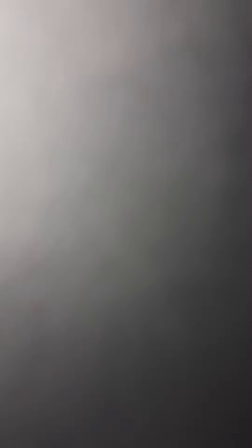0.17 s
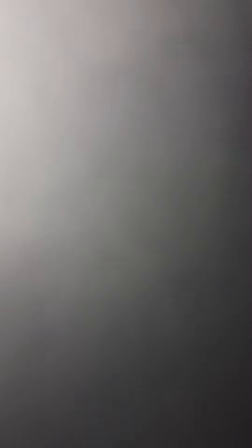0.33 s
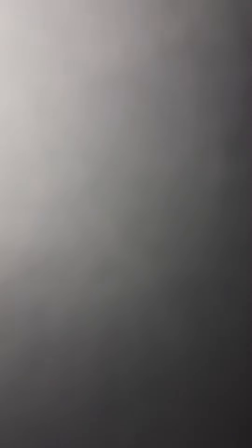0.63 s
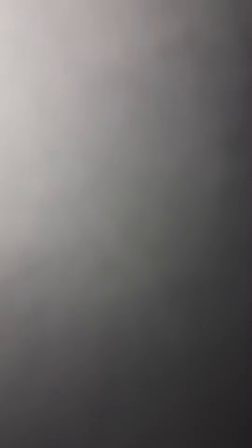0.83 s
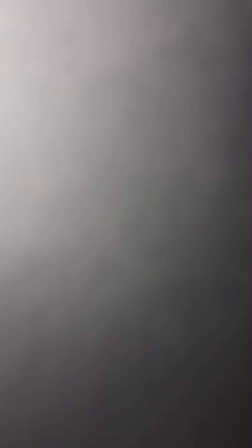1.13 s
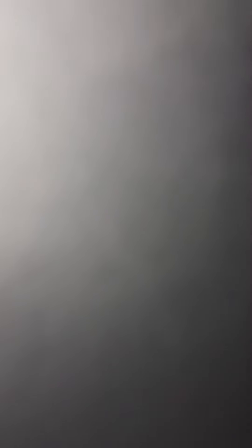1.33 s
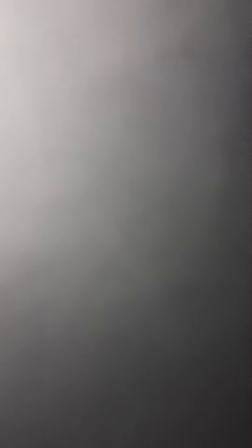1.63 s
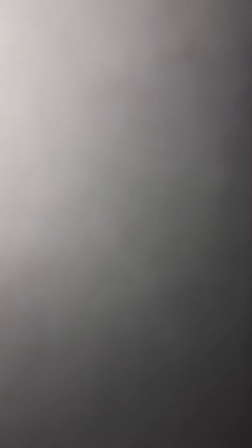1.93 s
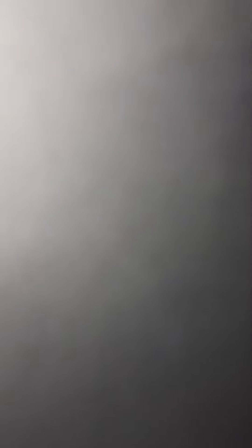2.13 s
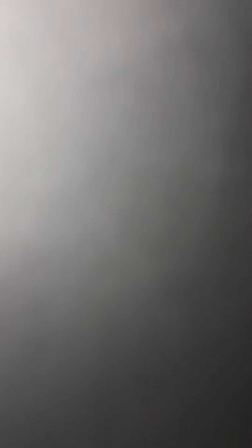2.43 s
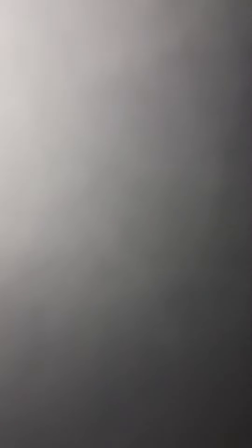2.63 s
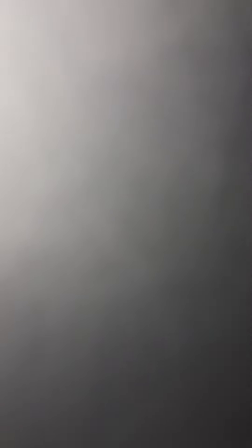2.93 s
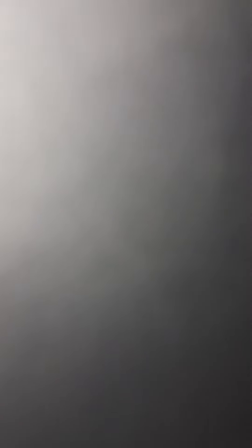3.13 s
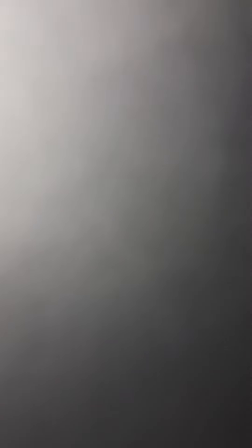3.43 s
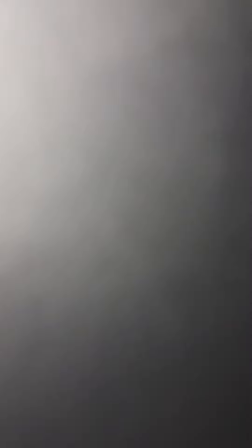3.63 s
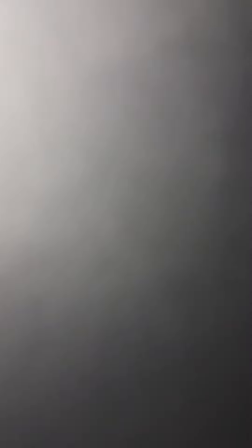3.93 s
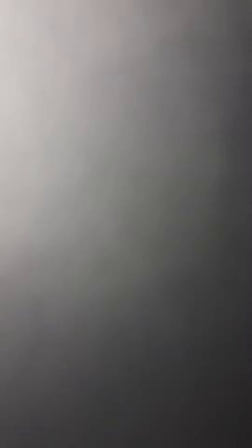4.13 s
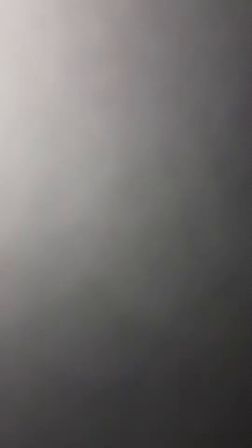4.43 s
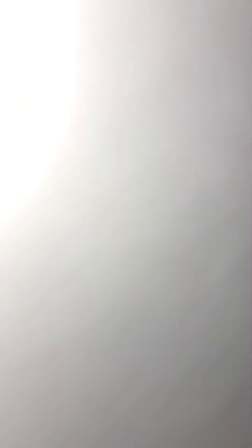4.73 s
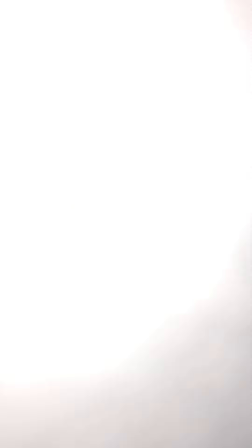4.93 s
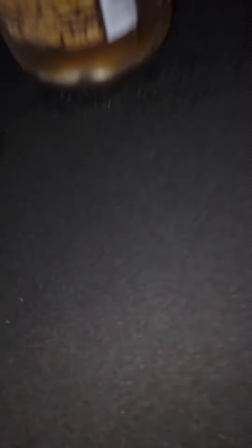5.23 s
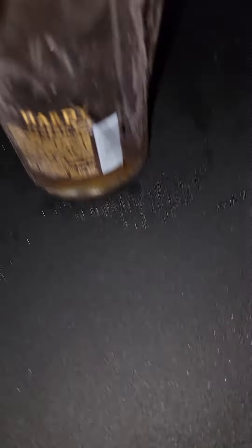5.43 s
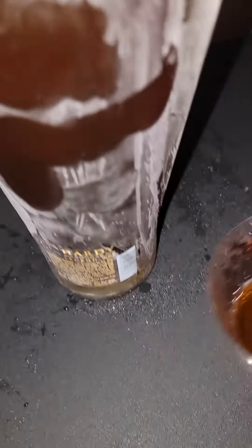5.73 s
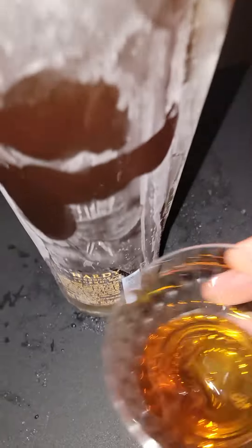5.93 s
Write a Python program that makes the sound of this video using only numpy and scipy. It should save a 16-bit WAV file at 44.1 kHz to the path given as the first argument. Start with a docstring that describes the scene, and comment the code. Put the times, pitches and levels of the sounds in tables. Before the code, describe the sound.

Glassware knocks and clinks on a wooden table, then fingers rub loudly against the microphone and a glass slides along.

```python
"""At a hard wooden table in a quiet room, a glass bottle and a drinking glass are knocked about.
They clink and the liquid plips. A recorder lies on the table, so each blow reaches it as a thud
through the wood. Fingers then drag the recorder off: its case rubs, sticks and slips right at the
microphones. Last, the glass slides over the table top. The room hums softly underneath."""
import sys
import numpy as np
from scipy import signal
from scipy.fft import rfft, irfft
from scipy.io import wavfile

SR = 44100
rng = np.random.default_rng(int(sys.argv[2]) if len(sys.argv) > 2 else 0)


def transcribe(u):
    """Save the signal u as a 16-bit wav file named by the first command-line argument.

    u: samples, shape (n,) or (channels, n), limited to [-1, 1]; the rate is SR.
    q: integer samples, one column per channel.
    """
    v = np.clip(np.atleast_2d(u).T, -1, 1)
    q = np.round(v * 32767).astype(np.int16)
    wavfile.write(sys.argv[1], SR, q)


N = 267687
TIME = np.arange(N) / SR
RING_TIME = TIME[:SR // 2]   # half a second for one blow to ring out

# The tone of glass hitting wood: (frequency [Hz], relative level [dB])
CRACK_TONE = [(500, -4), (1000, -2), (1800, -10), (3000, -14), (4800, -16.5), (6000, -24.5), (7700, -22.5),
              (9900, -38.5), (16000, -42)]


def knocks():
    """Glassware lands twice, on its edge and then flat on its foot; a light knock strikes once, softly."""
    # Glassware set down: (time [s], force [dB], extra thump [dB], extra crack [dB], time to fall flat [s])
    landings = [(0.311, -15, 5, -28, 0.0066), (0.42, -27.5, 6, -5, 0.0055), (0.583, -17, -28, -7, 0.0055),
                (2.738, -18, 2.5, -24, .013)]
    # Light knocks: (time [s], force [dB], extra crack [dB])
    light_knocks = [(0.729, -42, -6), (1.05, -43, -42), (1.0883, -25, -13.5), (1.289, -41, -37),
                    (1.718, -27, -6.5), (1.807, -46.5, 4.5), (2.2527, -33, -13), (2.297, -33.5, -9),
                    (2.98, -22, -11), (3.104, -25.5, -30), (3.41, -48.5, -29.5)]
    out = np.zeros((2, N))
    for s, force_db, thump_db, crack_db, fall_s in landings:
        add(out, s, blow(force_db, thump_db, crack_db))
        add(out, s + fall_s, blow(force_db + 3, thump_db - 11.5, crack_db=-16))
    muffle = signal.butter(1, 2630, fs=SR)
    for s, force_db, crack_db in light_knocks:
        knock = blow(force_db, thump_db=-16.5, crack_db=crack_db)
        add(out, s, signal.lfilter(*muffle, knock) * fade_in(0.0014))
    return out


def blow(force_db, thump_db, crack_db):
    """A blow sways the table, rings its top and cracks at the point of contact."""
    thump = from_db(thump_db) * table_sway()
    contact = from_db(crack_db) * crack(t60=0.0037, tail_db=-18.5, tail_t60=0.059)
    return from_db(force_db) * (thump + table_top() + contact)


def table_top():
    """The wooden top rings after one contact."""
    # Its notes: (pitch [Hz], relative level [dB], ring time [s])
    notes = [(125.3, -8, 0.24), (212, -6.5, 0.2), (265.9, 1, 0.1), (346, 10.5, 0.086), (431, 8, 0.063),
             (556.4, 4.5, 0.081), (776, 3, 0.029), (914, 3.5, 0.031), (1093, -6.5, 0.033),
             (1518, -5, 0.021)]
    return body(notes, vary_db=2, pan_db=1, pan_octave_db=0.22, detune=0.028, twist=3.724, twist_hz=280.2)


def table_sway():
    """The whole table sways with a low thump."""
    # Its notes: (pitch [Hz], relative level [dB], ring time [s])
    notes = [(66, 1.5, 0.046), (84, 0.5, 0.11), (109, -5, 0.075)]
    return body(notes, vary_db=3.5, pan_db=4.5, pan_octave_db=-1.5, detune=0.012, twist=1, twist_hz=75)


def body(notes, vary_db, pan_db, pan_octave_db, detune, twist, twist_hz, in_step=False):
    """A struck object rings at its own notes, tuned a little differently by each grip or load."""
    out = 0
    for k, (hz, level_db, t60) in enumerate(notes):
        # Notes above twist_hz shake the two microphones out of step, by up to twist radians.
        lag = twist / (1 + (twist_hz / hz) ** 6)
        hz = hz * np.exp(detune * rng.standard_normal())
        swing = np.sin(2 * np.pi * hz * RING_TIME + np.array([[0], [-lag]]))
        swell = 1 - np.exp(-(2 * hz * RING_TIME) ** 2)   # builds up in about half a cycle
        fade = fade_out(t60, level_db + vary_db * rng.standard_normal())
        sign = 1 if in_step else (-1) ** k
        octaves_up = np.log2(hz / notes[0][0])
        out = out + sign * panned(swing * swell * fade, pan_db + pan_octave_db * octaves_up)
    return unit_hit(out)


def crack(t60, tail_db, tail_t60):
    """A hard contact rings many high notes at once: a short burst of noise with a weak tail."""
    fade = fade_out(t60) + fade_out(tail_t60, tail_db)
    noise = rng.standard_normal((2, len(fade)))
    opposed = 1.59 * rng.standard_normal(len(fade)) * [[1], [-1]]   # left and right swing opposite ways
    return unit_hit(colour((noise + opposed) * fade, CRACK_TONE))


def handling():
    """Fingers rub the recorder's case: a light grip and longer drags, with shoves and slips on top."""
    # The hand's steady light rubbing: (start [s], length [s], level [dB])
    grip = [(3.56, 1.314, -35.5)]
    # Fingers dragging over the case: (start [s], length [s], level [dB])
    drags = [(3.768, 0.045, -26), (3.855, 0.19, -15.5), (4.06, 0.043, -22.5), (4.26, 0.041, -17.5),
             (4.44, 0.23, -28)]
    # Hard shoves: (start [s], length [s], level [dB])
    shoves = [(3.548, 0.073, -10.5), (4.178, 0.0076, -16), (4.3, 0.027, -14), (4.51, 0.15, -22),
              (4.567, 0.062, -19.5), (4.786, 0.055, -23)]
    # How a firm grip changes the tone: (frequency [Hz], boost [dB])
    firm_tone = [(300, -5), (1200, 4), (12000, 3.5)]
    # A high ring under a firm grip: (pitch [Hz], width [Hz], boost [dB])
    firm_peaks = [(2617, 64, 7.5)]
    hold = effort(grip, rise_s=0.03, sag_db_per_s=2.5, fade_s=0.127)
    drag = effort(drags, rise_s=0.32, sag_db_per_s=14.5, fade_s=0.38)
    # The fingers catch and let go: a new random level every 5 ms.
    flutter = from_db(1.47 * np.interp(TIME / 0.005, np.arange(N), rng.standard_normal(N)))
    rub = np.maximum(hold, drag) * flutter * case_scrape(loose=1.4, per_s=1900, spread_db=2.5)
    push = effort(shoves, rise_s=0.041, sag_db_per_s=64.5, fade_s=0.085)
    firm_scrape = colour(case_scrape(loose=1, per_s=1600, spread_db=1.55), firm_tone)
    shove = push * resonate(firm_scrape, firm_peaks)
    return hand_hollow(rub + shove + slips())


def case_scrape(loose, per_s, spread_db):
    """Rubbing shakes the whole case and also rocks it, moving the microphones opposite ways."""
    # The tone of the rubbing: (frequency [Hz], relative level [dB])
    rub_tone = [(40, -24.5), (140, -19.5), (280, -6), (520, -16.5), (1500, -31.5), (3000, -37), (4200, -42),
                (5000, -47.5), (8000, -59.5), (9500, -73), (16000, -71.5)]
    # How much stronger rocking is than shaking: (frequency [Hz], boost [dB])
    rock_tone = [(100, 2), (220, -10.5), (350, 8), (900, 6.5), (3000, 0.5)]
    # Where the held case rings: (pitch [Hz], width [Hz], boost [dB])
    case_peaks = [(286, 38.7, 8.5), (692, 120, 8), (895, 39, 5.5), (7150, 550, 10)]
    shake = friction(per_s, spread_db)
    twist = unit_power(shake + loose * friction(per_s, spread_db))
    rock = colour(twist, rock_tone) * [[-1], [1]]
    return resonate(colour(shake + rock, rub_tone), case_peaks)


def slips():
    """The case sticks and slips under the fingers, singly or in creaking runs."""
    # The grip lets go: (time [s], ring level [dB], snap level [dB])
    releases = [(3.5454, -19.5, -20), (3.6155, -21.5, -28), (3.724, -27.5, -37), (4.004, -24, -40.5),
                (4.141, -26, -37), (4.1897, -17.5, -36.5), (4.244, -28.5, -34.5), (4.2648, -14, -24.5),
                (4.285, -21, -20), (4.2993, -17, -22), (4.3131, -21, -22.5), (4.3211, -19, -25.5),
                (4.3499, -24, -30), (4.368, -21.5, -33), (4.4094, -28, -30), (4.4934, -21, -18.5),
                (4.5209, -12.5, -20.5), (4.5254, -17, -21.5), (4.5437, -23.5, -17), (4.5631, -11, -16),
                (4.581, -14.5, -17.5), (4.588, -15.5, -18.5), (4.5927, -15.5, -31.5), (4.603, -13.5, -21),
                (4.6123, -13, -31), (4.6309, -14, -27.5), (4.6391, -16.5, -28), (4.6471, -14, -40.5),
                (4.659, -27, -32), (4.6817, -19.5, -35), (4.789, -13.5, -25.5), (4.812, -14.5, -26)]
    # A looser grip lets the case ring longer: (time [s], ring time [times the usual])
    looseness = [(4.27, 0.54), (4.5, 0.29), (4.55, 1.64), (4.6, 0.8), (4.8, 1.33)]
    out = np.zeros((2, N))
    for s, ring_db, snap_db in releases:
        ring_stretch = np.interp(s, *np.transpose(looseness))
        add(out, s, slip(ring_db, snap_db, ring_stretch))
    return out


def slip(ring_db, snap_db, ring_stretch):
    """One slip is a sharp snap with a brief chatter, and it sets the case ringing."""
    # The notes of the case: (pitch [Hz], relative level [dB], usual ring time [s])
    case_notes = [(217.6, 1, 0.1), (306, -2.5, 0.11), (379, -0.5, 0.063), (558, -1, 0.067),
                  (700, 4.5, 0.031)]
    # The tone of the snap: (frequency [Hz], relative level [dB])
    snap_tone = [(120, -21), (600, 14), (1100, 0), (1700, -3), (2300, -5), (3100, -15), (4400, -18),
                 (7300, -22), (9700, -43.5), (16000, -40.5)]
    notes = [(hz, note_db, t60 * ring_stretch) for hz, note_db, t60 in case_notes]
    ring = body(notes, vary_db=3.5, pan_db=2, pan_octave_db=-3.5, detune=0.1, twist=-2.47, twist_hz=323,
                in_step=True)   # struck right at the microphones, so all notes start in step
    pulse = rng.standard_normal((2, len(RING_TIME))) * fade_out(t60=0.017, level_db=-13)
    pulse[0, round(0.00045 * SR)] -= 1   # the snap reaches the left microphone later
    pulse[1, 0] -= 1
    snap = panned(unit_hit(colour(pulse, snap_tone)), pan_db=-3)
    return from_db(ring_db) * ring + from_db(snap_db) * snap


def hand_hollow(x, block=256):
    """The air between hand and case rings, sinking in pitch as the hand closes."""
    # Where that air rings: (final pitch [Hz], width [Hz], boost [dB])
    air_peaks = [(1184, 120, 5.5), (1630, 140, 4.5), (3747, 400, 8.5)]
    # The hand closing: (time [s], height above the final pitch [octaves])
    closing = [(3.78, 0.075), (3.95, 0)]
    pitch_ratio = 2 ** np.interp(TIME, *np.transpose(closing))
    out = x.copy()
    for hz, width, peak_db in air_peaks:
        state = np.zeros((2, 2))
        for i in range(0, N, block):
            band = signal.iirpeak(hz * pitch_ratio[i], hz / width, fs=SR)
            ring, state = signal.lfilter(*band, x[:, i:i + block], zi=state)
            out[:, i:i + block] += (from_db(peak_db) - 1) * ring
    return out


def glassware():
    """The glass, the bottle and a rim each clink with their own notes."""
    # Touches: (time [s], level [dB], hardness [dB per octave])
    glass_touches = [(1.714, -36.5, 0.0041)]
    bottle_touches = [(0.3115, -39, 12), (0.420, -47, 12), (2.736, -27, -1), (2.891, -60, 13)]
    rim_touches = [(3.164, -43.5, 0.014)]
    # What rings: (pitch [Hz], relative level [dB], ring time [s])
    glass = [(1895, -3, 0.16), (1970, -15, 0.32), (2000, -6, 0.17), (2820, -13, 0.11), (3560, 2.5, 0.028),
             (3925, 3.5, 0.053), (5750, -15, 0.12), (7700, -27, 0.12)]
    bottle = [(2125, -3, 0.15), (2300, -4, 0.13), (3736, -17, .09), (4760, -10, .07), (5125, -4, .055),
              (7350, -21, 0.05)]
    rim = [(2810, -17, 0.17), (2880, -20, 0.45), (7321, -24, 0.16)]
    return clinks(glass_touches, glass) + clinks(bottle_touches, bottle) + clinks(rim_touches, rim)


def clinks(touches, notes):
    """Uneven glass walls split each note into a cluster of tones; harder touches favour high notes."""
    pitch_spread, side_db, side_ring_share = 0.078, -8, 0.54
    mic_phase = np.array([[0], [2.1]])   # radians: left and right are out of step
    out = np.zeros((2, N))
    for s, touch_db, hardness in touches:
        for hz, note_db, t60 in notes:
            level_db = touch_db + note_db + hardness * np.log2(hz / notes[0][0])
            side_pitches = hz * np.exp(pitch_spread * rng.standard_normal(4))
            sides = [(side_hz, side_db, t60 * side_ring_share) for side_hz in side_pitches]
            for tone_hz, tone_db, ring_s in [(hz, 0, t60)] + sides:
                swing = np.sin(2 * np.pi * (tone_hz * RING_TIME + rng.random()) + mic_phase)
                add(out, s, swing * fade_out(ring_s, level_db + tone_db) * fade_in(0.002))
    return out


def grazes():
    """Glass grates on the table as it lands or turns; the harder the touch, the more hiss in it."""
    # Brief scrapes: (time [s], pressure [dB], time to die away [s])
    scrapes = [(0.31, -26.5, 0.18), (0.418, -47, 0.32), (0.582, -29, 0.14), (2.746, -35, 0.14),
               (3.095, -33.5, 0.066)]
    grit = np.array([friction(per_s=2000, spread_db=5.5) for side in range(2)])
    pressure = sum(stroke(s, 0, level_db, rise_s=0.028, sag_db_per_s=0, fade_s=fade_s)
                   for s, level_db, fade_s in scrapes)
    hiss = pressure * unit_power(colour(grit, CRACK_TONE))
    top = table_top()
    rattle = ring_through(pressure ** 0.83 * grit[:1], top / np.linalg.norm(top[0]))
    return panned(hiss, pan_db=-0.5) + from_db(5.5) * rattle


def slide():
    """The foot of the glass grinds along: the table top rumbles and the grit hisses with each push."""
    # Pushes: (start [s], length [s], strength [dB])
    pushes = [(2.19, 0.18, -48.5), (4.87, 0.36, -44.5), (5.295, 0.039, -34.5), (5.42, 0.31, -30),
              (5.51, 0.034, -22.5), (5.625, 0.014, -22), (5.705, 0.015, -25.5)]
    # The tones of the rumble and of the grit: (frequency [Hz], relative level [dB])
    rumble_tone = [(60, -49), (160, 8.5), (260, -4.5), (380, 3.5), (490, -17), (1200, -56.5)]
    grit_tone = [(290, 3.5), (520, 4.5), (1100, -4), (2000, -15), (4200, -20.5), (5200, -28), (6500, -20.5),
                 (7700, -25.5), (16000, -97)]
    # Where the sliding glass rings: (pitch [Hz], width [Hz], boost [dB])
    glass_peaks = [(558, 15, 10.5), (1260, 290, 3)]
    push = effort(pushes, rise_s=0.16, sag_db_per_s=-5.5, fade_s=0.15)   # each push grows a little
    rumble = unit_power(colour(friction(per_s=3100, spread_db=2.5), rumble_tone))
    grit = np.array([friction(per_s=1000, spread_db=1.5) for side in range(2)])
    hiss = resonate(colour(grit, grit_tone), glass_peaks)
    return panned(push * (from_db(-8) * rumble + from_db(-10) * hiss), pan_db=-1.5)


def rocking():
    """The bottle rocks on its foot and nudges the table again and again: a low rumble."""
    # The spell of rocking: (start [s], length [s], level [dB])
    spells = [(0.36, 0.25, -32)]
    nudges = friction(per_s=18, spread_db=3.5)
    rumble = unit_power(ring_through(nudges, table_sway()))
    return effort(spells, rise_s=0.077, sag_db_per_s=28, fade_s=0.35) * rumble


def ticks():
    """Glass just touches the table: a dry click with no thud."""
    # Touches: (time [s], level [dB])
    touches = [(2.09, -59.5), (2.891, -49), (3.093, -44), (3.134, -56.5)]
    out = np.zeros((2, N))
    cut_lows = signal.butter(1, 2405, "high", fs=SR)
    for s, level_db in touches:
        click = signal.lfilter(*cut_lows, crack(t60=0.02, tail_db=-22, tail_t60=0.07))
        add(out, s, from_db(level_db) * unit_hit(click))
    return out


def plips(pitch_hz=1480):
    """A bubble in the bottle swells and rings briefly, rising a little in pitch."""
    # Bubbles: (time [s], level [dB])
    bubbles = [(1.317, -60), (3.32, -60)]
    swing = np.sin(2 * np.pi * pitch_hz * RING_TIME * (1 + RING_TIME / 2))
    out = np.zeros((2, N))
    for s, level_db in bubbles:
        add(out, s, swing * fade_out(0.088, level_db) * fade_in(0.0036))
    return out


def room(x, echo_db, t60):
    """The small room adds a faint, smooth echo."""
    tail = rng.standard_normal((2, len(RING_TIME))) * fade_out(t60) * fade_in(0.0018)
    tail /= np.sqrt(np.sum(tail ** 2, axis=1, keepdims=True))
    return x + from_db(echo_db) * ring_through(x, tail)


def background(hum_hz=59.3):
    """Still air and a low hum."""
    # The tone of the quiet room: (frequency [Hz], relative level [dB])
    air_tone = [(20, -34.5), (60, -7.5), (95, -17), (250, -24.5), (650, -39.5), (1060, -37.5),
                (1400, -47.5), (2200, -47.5), (2800, -43.5), (4000, -49.5), (16000, -65.5)]
    air = unit_power(colour(rng.standard_normal((2, N)) + rng.standard_normal(N), air_tone))
    hum = unit_power(np.sin(2 * np.pi * hum_hz * TIME))
    return from_db(-62) * air + from_db(-59) * hum


def friction(per_s, spread_db):
    """Two surfaces make tiny slips at random times, a few much larger than the rest."""
    sizes = from_db(spread_db * np.minimum(rng.exponential(1, N), 4))
    return unit_power(sizes * rng.choice([-1, 1], N) * (rng.random(N) < per_s / SR))


def stroke(s, length, level_db, rise_s, sag_db_per_s, fade_s):
    """Loudness of one movement: it rises, holds with a sag and dies away; rise and fade span 60 dB."""
    early, late = np.maximum(s - TIME, 0), np.maximum(TIME - s - length, 0)
    loss_db = np.minimum(60 * (early / rise_s + late / fade_s), 200)
    sag_db = sag_db_per_s * np.clip(TIME - s, 0, length)
    return from_db(level_db - loss_db - sag_db)


def effort(moves, rise_s, sag_db_per_s, fade_s):
    """Loudness of a series of movements; the strongest one leads."""
    return np.max([stroke(*move, rise_s, sag_db_per_s, fade_s) for move in moves], axis=0)


def fade_in(rise_s):
    """Soften the start of a ring."""
    return 1 - np.exp(-RING_TIME / rise_s)


def fade_out(t60, level_db=0):
    """A ring dies away, losing 60 dB in its ring time of t60 seconds."""
    return from_db(level_db - 60 * RING_TIME / t60)


def colour(x, tone, size=4096):
    """Give a sound a tone, with no ringing ahead of it (a minimum-phase filter)."""
    hz, level_db = np.transpose(tone)
    grid = np.maximum(np.fft.rfftfreq(size, 1 / SR), 1)
    gains = from_db(np.interp(np.log(grid), np.log(hz), level_db))
    cepstrum = irfft(np.log(gains))
    cepstrum[1:size // 2] *= 2
    cepstrum[size // 2 + 1:] = 0
    response = irfft(np.exp(rfft(cepstrum)))
    return ring_through(x, response[None])


def ring_through(x, response):
    """Let every sample of a sound set off the same ring."""
    return signal.fftconvolve(np.atleast_2d(x), response, axes=1)[:, :x.shape[-1]]


def resonate(x, peaks):
    """Boost narrow bands of a sound, then scale it to a power of one."""
    for hz, width, peak_db in peaks:
        ring = signal.lfilter(*signal.iirpeak(hz, hz / width, fs=SR), x)
        x = x + (from_db(peak_db) - 1) * ring
    return unit_power(x)


def from_db(db):
    """Turn decibels into a multiplier."""
    return 10 ** (np.asarray(db) / 20)


def unit_power(x):
    """Scale to a power of one."""
    return x / np.sqrt(np.mean(x ** 2) + 1e-20)


def unit_hit(x):
    """Scale a blow to a power of one over its first 20 ms."""
    return x / np.sqrt(np.mean(x[..., :SR // 50] ** 2) + 1e-20)


def panned(x, pan_db):
    """Lean a sound to the left by so many dB."""
    return x * from_db([[pan_db / 2], [-pan_db / 2]])


def add(out, s, sound):
    """Mix a sound in at s seconds."""
    at = round(s * SR)
    out[:, at:at + sound.shape[-1]] += sound[..., :N - at]


def scene():
    """Knocks and clinks, the recorder picked up, the glass pushed along."""
    table = glassware() + knocks() + ticks() + rocking() + grazes() + plips() + slide()
    return room(table + handling(), echo_db=-31, t60=0.35) + background()


def record(dry):
    """The microphones drop the deepest bass, the hardest peaks overload, the highest treble is cut."""
    cut_bass = signal.butter(2, 40, "high", fs=SR, output="sos")
    cut_treble = signal.cheby2(14, 60, 16600, fs=SR, output="sos")
    heard = signal.sosfilt(cut_bass, dry)
    rounded = heard / (1 + heard ** 6) ** (1 / 6)
    return signal.sosfilt(cut_treble, rounded)


dry = scene()
out = record(dry)
transcribe(out)
```